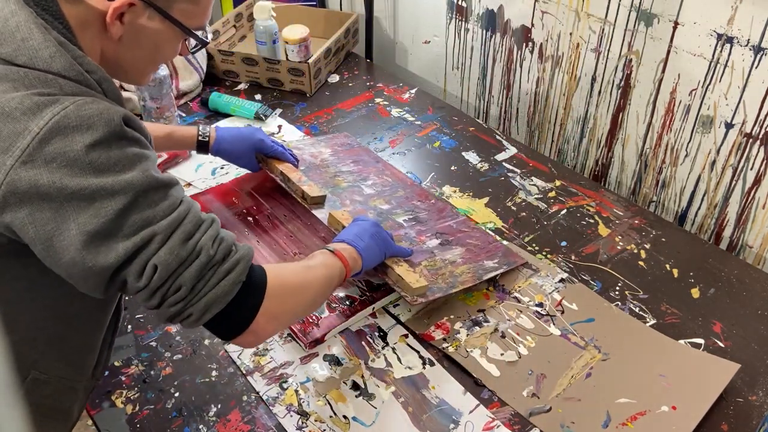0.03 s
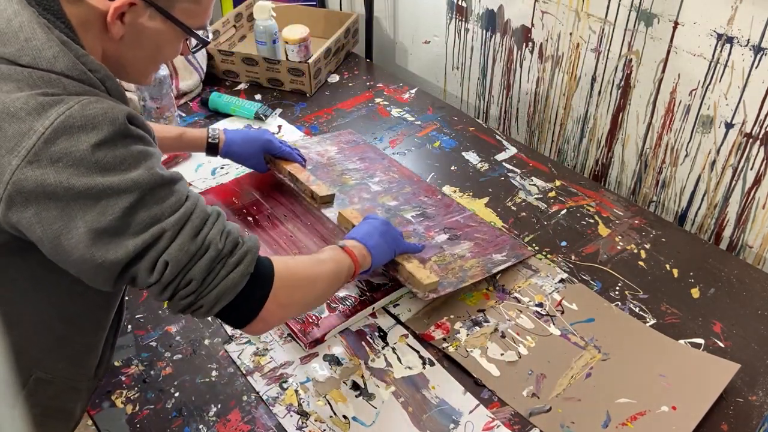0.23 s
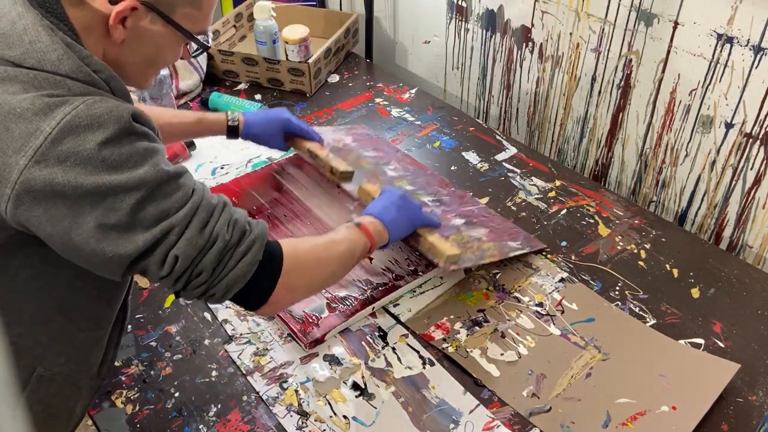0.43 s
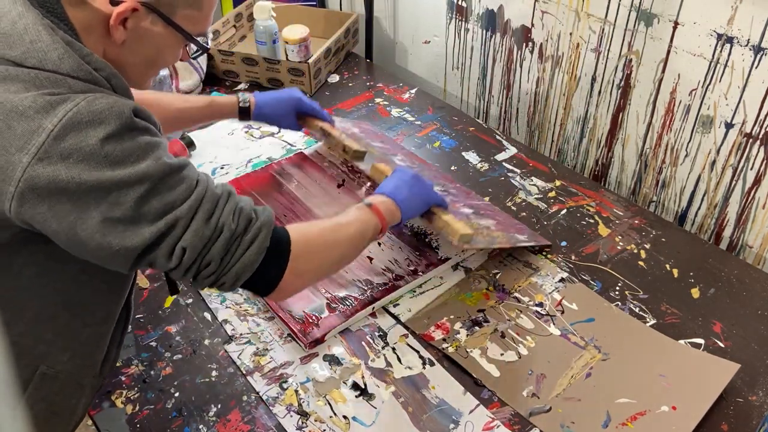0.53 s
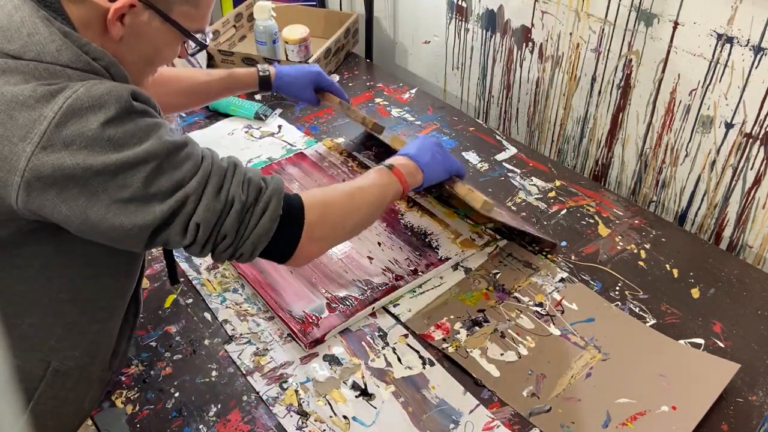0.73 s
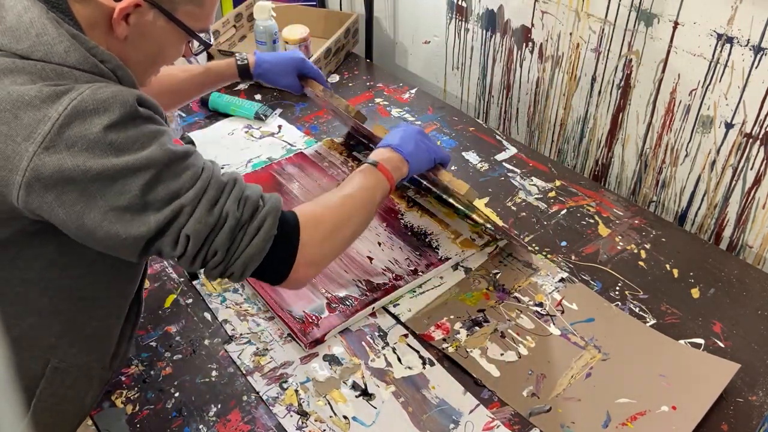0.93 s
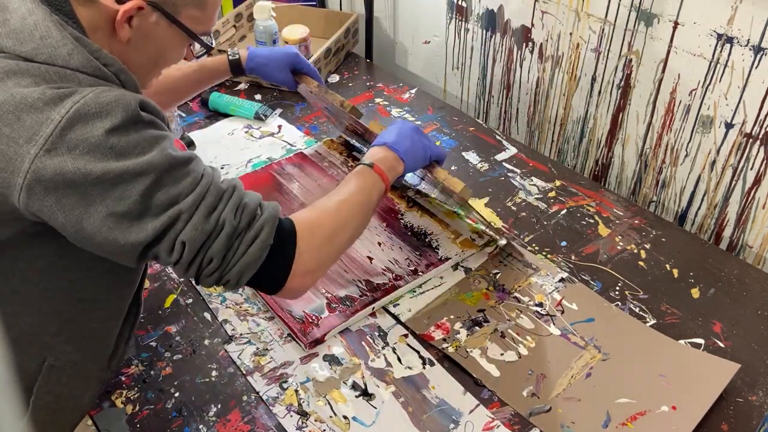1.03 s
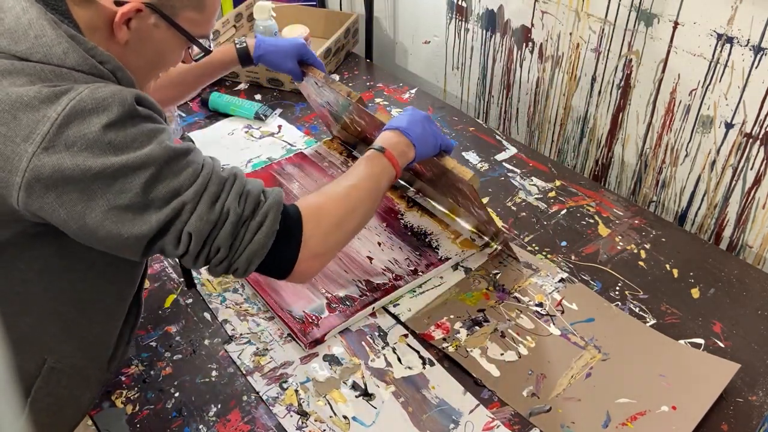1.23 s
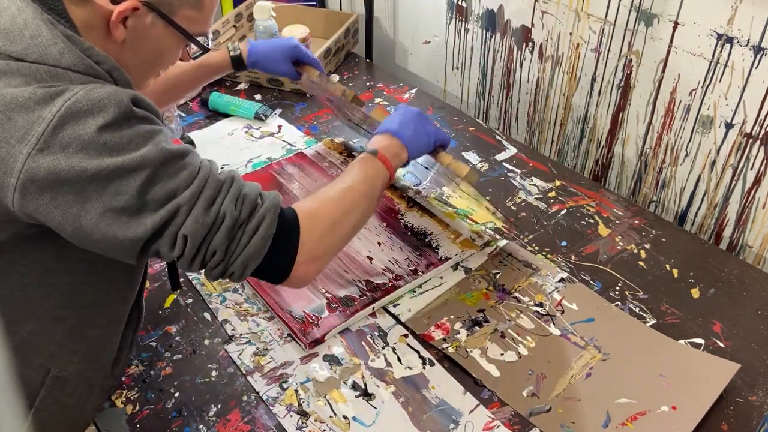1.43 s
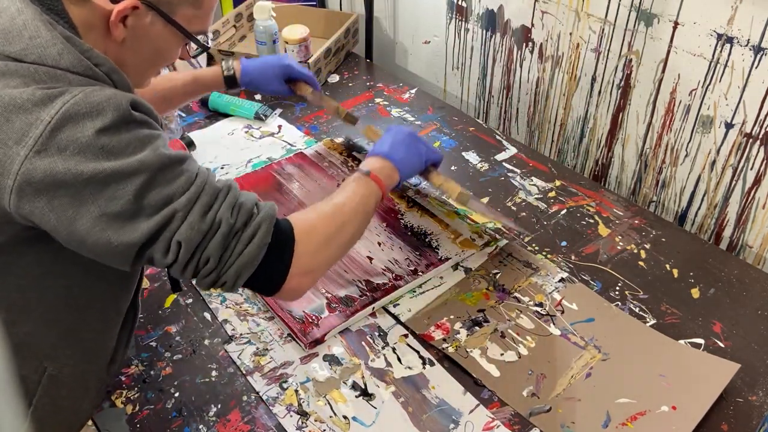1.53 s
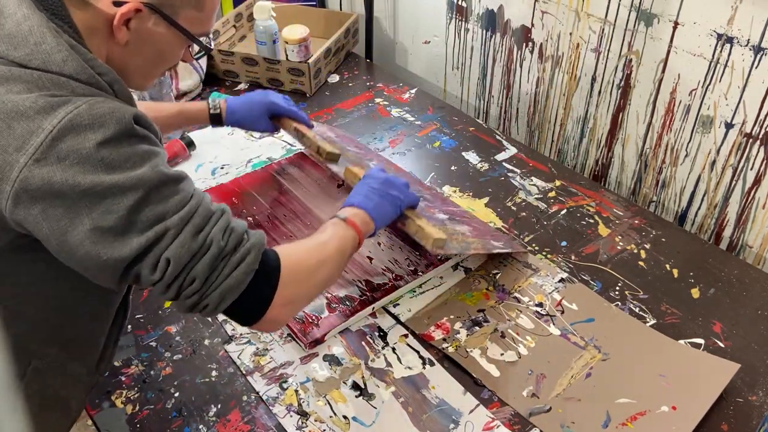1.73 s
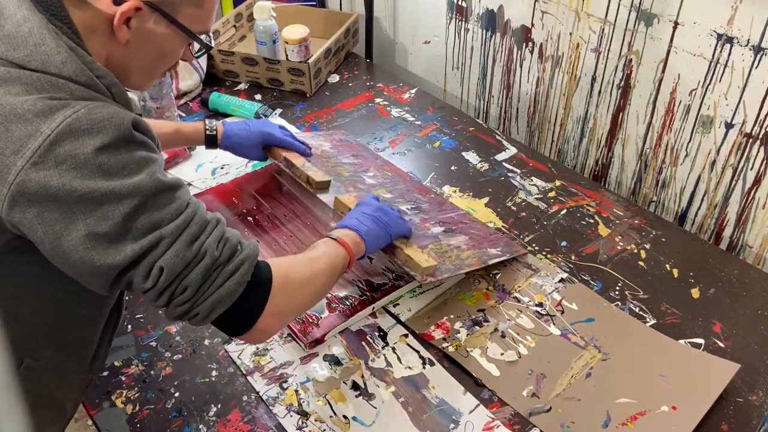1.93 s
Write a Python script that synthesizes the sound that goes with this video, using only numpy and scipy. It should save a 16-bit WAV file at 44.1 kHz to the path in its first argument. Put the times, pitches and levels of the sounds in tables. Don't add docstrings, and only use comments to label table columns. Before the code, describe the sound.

Rough, juddering scrape of a broad blade over wet canvas, a clattering lift, pause, and sharp knock

```python
import sys
import numpy as np
from scipy import signal
from scipy.fft import rfft, irfft
from scipy.io import wavfile
from scipy.ndimage import uniform_filter1d

SR = 44100
rng = np.random.default_rng(int(sys.argv[2]) if len(sys.argv) > 2 else 0)


def dump(signal):
    limited = np.clip(np.atleast_2d(signal).T, -1, 1)
    pcm = np.round(limited * 32767).astype(np.int16)
    wavfile.write(sys.argv[1], SR, pcm)


def volts_from_db(level):
    exponent = np.asarray(level, float) / 20
    return 10 ** exponent


N = 88200
T = np.arange(N) / SR


def unit(x):
    return x / np.sqrt(np.mean(x ** 2))


def curve(table, hz):
    f, v = np.array(table, float).T
    return np.interp(np.log(hz + 1), np.log(f + 1), v)


def colour(x, table):
    cepstrum = irfft(curve(table, np.arange(4097) * SR / 8192) * np.log(10) / 20)
    cepstrum[1:4096] *= 2
    cepstrum[4097:] = 0
    response = irfft(np.exp(rfft(cepstrum)))[:4096]
    return signal.fftconvolve(x, response)[:len(x)]


def butter(x, order, hz, kind="low"):
    return signal.sosfilt(signal.butter(order, hz, kind, fs=SR, output="sos"), x)


def fade(t60):
    return np.exp(-np.log(1000) * T / t60)


def burst(s, length):
    return (T >= s) * np.exp(-np.maximum(T - s, 0) / max(length, .001))


def walk(rate):
    held = np.interp(T * rate // 1, np.arange(4000), rng.standard_normal(4000))
    return 1.2 * uniform_filter1d(held, int(SR / rate))


def grains(rate, scatter_db):
    chance, sign, size = rng.random((3, N))
    slips = (chance < rate / SR) * np.sign(sign - .5)
    return unit(slips * volts_from_db(-scatter_db * np.log(size + 1e-4)))


def steady(slips):
    steady_s = .015
    power = uniform_filter1d(butter(slips, 2, 1300) ** 2, int(steady_s * SR))
    return unit(slips / np.sqrt(power + 1e-4))


def wide(mid, side):
    side = butter(side, 2, 362, "highpass")
    return np.array([mid + side, mid - side])


def studio():
    # (frequency [Hz], density [dB per Hz])
    noise_floor = [(24, 1), (40, 4.5), (71, 7), (346, -23.5), (412, -25), (1500, -41.5), (6950, -49.5),
                   (9130, -53), (12600, -48.5), (15000, -61)]
    floor_db, swell_db, swells_per_s, air_db = -51, 1.2, 18.0, -11.5
    mid, side = (colour(n, noise_floor) for n in rng.standard_normal((2, N)))
    air = volts_from_db(air_db) * side * np.array([[1], [-1]])
    return volts_from_db(floor_db + swell_db * walk(swells_per_s)) * (wide(mid, side) + air) / np.std(mid)


def effort():
    # (time [s], pressure [dB], edge hiss re pressure [dB], bite [dB])
    strokes = [
        [(0.0, -61, -6.5, -9.5), (0.052, -62.5, -5.5, -0.5), (0.132, -45, -12, -5.5), (0.144, -55, -14, 3.5),
         (0.164, -56, -1.5, 22.5), (0.194, -49.5, -11, -9.5), (0.202, -53, -11, -8.5), (0.266, -65, 6.5, 9),
         (0.285, -59, 0, 4)],
        [(0.29, -52.5, -14.5, 9.5), (0.305, -41.5, -17.5, 7.5), (0.335, -34.5, -14, 0), (0.36, -33, -11, 10),
         (0.382, -27, -14, 4), (0.403, -25, -27.5, -3.5), (0.425, -34, -11, -14.5), (0.46, -33.5, -20.5, -14),
         (0.5, -39, -15.5, -9)],
        [(0.52, -46, -20, -13.5), (0.56, -42.5, -9, -1.5), (0.59, -35, -20, -11.5), (0.618, -41, -9, -18.5),
         (0.66, -40.5, -11, -22.5), (0.69, -46.5, -9, -20.5), (0.72, -52.5, -8, -32), (0.75, -53.5, -1.5, -9)],
    ]
    # (time [s], pressure [dB], edge hiss re pressure [dB], bite [dB])
    returns = [
        [(0.755, -51, -10.5, -2.5), (0.767, -50.5, -3.5, -18), (0.819, -44, 0.5, 16), (0.927, -35, -16.5, -9.5),
         (0.951, -40, -10.5, 6), (0.969, -29.5, -13, 3.5), (1.0, -37, -20.5, -9)],
        [(1.02, -43, -26, -17.5), (1.05, -49, -19.5, -16.5), (1.1, -43, -20, -18), (1.15, -49, -16.5, -18.5),
         (1.195, -48.5, -18, -13), (1.26, -60, -24, -15)],
        [(1.683, -50.5, -29, -14.5), (1.694, -30.5, -27, -17.5), (1.708, -27.5, -7, -5),
         (1.736, -34, -23.5, -15.5), (1.786, -41, -22.5, -11), (1.83, -42.5, -24.5, -24.5),
         (1.874, -60.5, -4, -45), (1.968, -64, 0, -15.5), (2.0, -43.5, -15.5, 25)],
    ]
    lift_s = .035
    press, hiss = 0, 0
    for rows in strokes + returns:
        s, db, rel, bite = np.array(rows, float).T
        on = (T >= s[0]) * np.exp(-np.maximum(T - s[-1], 0) / lift_s)
        press = press + on * volts_from_db(np.interp(T, s, db))
        hiss = hiss + on * volts_from_db(np.interp(T, s, db + rel))
    rows = np.concatenate(strokes + returns)
    return press, hiss, np.interp(T, rows[:, 0], rows[:, 3])


def rubbing(press):
    slips_per_s, scatter_db = 3000, 2.2
    judder_per_s, judder_db = 70, 1.2
    return press * volts_from_db(judder_db * walk(judder_per_s)) * steady(grains(slips_per_s, scatter_db))


def edge_hiss(hiss):
    # (frequency [Hz], density [dB per Hz])
    hiss_spectrum = [(880, -21.5), (1500, -6), (1900, -4.5), (3380, -4), (4080, -9.5), (7030, -9),
                     (9010, -11.5), (16000, -23.5)]
    threads_per_s, scatter_db = 5900, 1.5
    rustle = unit(colour(grains(threads_per_s, scatter_db), hiss_spectrum))
    return volts_from_db(1.5) * hiss * rustle * volts_from_db(0.28 * walk(36.25))


def even(ir):
    evenness, body_t60_s = .85, .03
    s = rfft(ir)
    return unit(irfft(s / np.abs(s) ** evenness, len(ir)) * fade(2 * body_t60_s)[:len(ir)])


def body(force):
    # (frequency [Hz], density [dB per Hz])
    radiation = [(59, -47), (100, -8), (280, -3), (355, -1.5), (430, -1), (670, -4), (808, -8), (994, -9),
                 (1720, -14.5), (6790, -34.5), (9000, -60), (11700, -85), (19800, -120)]
    # (frequency [Hz], level [dB], decay t60 [s])
    mode_table = [(209, 2, 0.46), (251.1, -5.5, 0.68), (281, 7.5, 0.07), (300, -3.5, 0.17),
                  (430.4, 7, 0.025), (494.6, 9.5, 0.043), (549.4, -4, 0.14), (675, 2, 0.12), (741, -7.5, 1),
                  (834, 2, 0.26), (1021.4, 10.5, 0.04), (1378, 4, 0.033), (2046, 10, 0.066)]
    place_s, body_t60_s = .07, .03
    mode_db, spread_db = -15.5, -3.5
    n, hop = 10000, int(place_s * SR)
    modes = []
    for hz, db, t60 in mode_table:
        ring = volts_from_db(db) * np.sqrt(1 / t60) * fade(t60) * np.sin(2 * np.pi * hz * T)
        modes.append(ring[:n])
    modes = np.array(modes)
    tone = colour(np.eye(1, 2048)[0], radiation)
    driven = signal.fftconvolve(force, tone / np.sqrt(np.sum(tone ** 2)))[:N]
    padded = np.pad(driven, (hop, 2 * hop))
    window, decay = np.hanning(2 * hop), fade(body_t60_s)[:n]
    out = np.zeros((2, N + SR))
    for k, (a, b) in enumerate(rng.standard_normal((40, 2, n))[:N // hop + 1]):
        strengths = np.tanh(b[-len(modes):])
        mid = even(a * decay) + volts_from_db(mode_db) * unit(strengths @ modes)
        side = volts_from_db(spread_db) * even(b * decay)
        pair = np.array([mid, side]) / np.sqrt(n)
        push = window * padded[k * hop:(k + 2) * hop]
        part = signal.fftconvolve(pair, push[None], axes=1)
        out[:, k * hop:k * hop + part.shape[1]] += part
    return out[:, hop:hop + N]


def thumps():
    # (time [s], level [dB], frequency [Hz])
    pushes = [(0.069, -61, 65), (0.122, -63, 65), (.31, -38, 63), (0.438, -42, 67.4), (.60, -41, 67.6),
              (0.829, -44, 68.8), (0.978, -35, 65), (1, -36.5, 126.5), (1.187, -54, 54),
              (1.201, -54.5, 142), (1.301, -52.5, 141.8), (0.032, -54, 129), (0.083, -44.5, 146.2),
              (1.522, -42.5, 48.2), (1.716, -39.5, 66.4), (1.729, -34.5, 142.2), (1.788, -46.5, 137),
              (1.878, -43, 68)]
    t60_s, attack_s = 0.59, 0.009
    out = 0
    for s, db, hz in pushes:
        swell = burst(s, t60_s / np.log(1000)) * (1 - burst(s, attack_s))
        out = out + volts_from_db(db) * swell * np.sin(2 * np.pi * hz * (T - s))
    return out


def knock(s, length):
    attack_s = .0012
    return burst(s, length) * (1 - burst(s, attack_s)) * 2


def knocks():
    # (time [s], strength [dB], thud re strength [dB], rattle length [s])
    blows = [(0.078, -54.5, -2, 0.008), (0.098, -57, -24, 0.019), (0.121, -53, -35, 0.072),
             (0.291, -48.5, 8.5, 0.0038), (0.3114, -44, -7, 0.032), (0.328, -43.5, -9, 0.01),
             (0.36, -45, 14, 0.0089), (0.376, -34.5, 3, 0.011), (0.449, -48, 13.5, 0.0063),
             (0.476, -50.5, 9, 0.0045), (0.753, -53, 6.5, 0.013), (0.793, -36, -1.5, 0.0031),
             (0.8942, -36.5, 4, 0.0068), (0.9206, -48.5, 13.5, 0.0098), (0.954, -40, -11, 0.0079),
             (0.9604, -31.5, -2, 0.028), (0.9773, -25, -15, 0.0032), (1.061, -41, -7, 0.0092),
             (1.0915, -42.5, -7, 0.026), (1.162, -45.5, -7, 0.0026), (1.6807, -35, -7.5, 0.011),
             (1.6974, -25.5, 7.5, 0.0022), (1.709, -37, 5, 0.005), (1.751, -46.5, 6, 0.014),
             (1.807, -40.5, 6, 0.0048)]
    # (frequency [Hz], density [dB per Hz])
    crack_spectrum = [(470, -40.5), (800, -10.5), (1410, -8), (1700, -8), (3600, -10), (3830, -14),
                      (16000, -43)]
    thud = sum(volts_from_db(db + rel) * knock(s, d) for s, db, rel, d in blows) * steady(grains(5000, 4.5))
    crack = sum(volts_from_db(db) * knock(s, d) for s, db, rel, d in blows) * grains(6000, 0.83)
    pulse = colour(np.eye(1, 4096)[0], crack_spectrum)
    return thud, volts_from_db(-4) * colour(crack, crack_spectrum) / np.sqrt(np.sum(pulse ** 2))


def scraper():
    bite_hz, bite_top_hz, bite_usual_db = 870, 2070, -10.5
    press, hiss, bite_db = effort()
    thud, crack = knocks()
    force = rubbing(press) + thud
    low, high = butter(force, 2, bite_hz), butter(force, 2, bite_hz, "high")
    upper = butter(high, 2, bite_top_hz)
    bite = volts_from_db((np.clip(bite_db, -24, 4) - bite_usual_db) / 2)
    mid, side = body(low / bite - high - (bite - 1) * upper)
    return mid + edge_hiss(hiss) + crack, side


def singing():
    # (start [s], end [s], level [dB],
    # frequency [Hz])
    rubbing_tones = [(1.58, 1.675, -78, 1330), (.82, .89, -51, 3380), (.84, .9, -45, 760), (.12, .155, -50, 550),
                     (1.27, 1.31, -72, 1550),
                     (.1, 0.146, -48, 410), (.295, 0.343, -39.5, 1210), (.36, 0.389, -32.5, 997),
              (.383, 0.419, -29, 675), (.402, .418, -30, 1023), (.4, .43, -39, 278), (.44, 0.493, -41, 963),
              (.565, 0.615, -41, 628), (.61, 0.662, -47, 672), (.69, 0.734, -45.5, 325),
              (.9, 0.95, -46, 1040), (.962, .99, -36.5, 1385), (.965, 1.0, -37, 557),
              (1.083, 1.132, -46.5, 1020), (1.681, 1.69, -44, 3400), (1.7, 1.754, -36.5, 549),
              (1.807, 1.839, -51, 580), (1.81, 1.858, -42.5, 310), (0.314, 0.34, -44, 379),
              (1.72, 1.776, -46, 202.6), (1.903, 1.963, -56, 190.6), (1.176, 1.22, -52, 210),
              (1.992, 1.996, -55.5, 1245)]
    out = 0
    for a, b, db, hz in rubbing_tones:
        tone = butter(rng.standard_normal(N), 2, [.91 * hz, 1.09 * hz], "bandpass")
        swell = np.interp(T, [a, a + (b - a) / 3, b, b + 0.0025], [0, 1, 1, 0])
        out = out + volts_from_db(db) * swell * unit(tone)
    return out


def ticks():
    # (time [s], strength [dB], centre frequency [Hz], length [s])
    snaps = [(0.641, -41.5, 11990, 0.0026), (0.69, -47.5, 6500, 0.0098), (1.164, -59, 6900, 0.0088),
             (1.322, -61, 3240, 0.0043), (1.329, -75, 2930, 0.033), (1.509, -81, 11100, 0.011),
             (1.891, -61.5, 9020, 0.0055), (1.968, -54.5, 10700, 0.045)]
    fade_s, width = 0.002, 0.96
    out = 0
    for s, db, hz, length in snaps:
        band = [hz * (1 - width / 2), min(hz * (1 + width / 2), 20000)]
        noise = unit(butter(rng.standard_normal(N), 2, band, "bandpass"))
        out = out + volts_from_db(db) * (T >= s) * np.exp(-np.maximum(T - s - length, 0) / fade_s) * noise
    return out


def room(x):
    room_db, t60_s, treble_t60_s, split_hz = -5.5, 0.44, 0.17, 1100
    evenness, onset_s = .6, 0.0037
    tails = []
    for n in rng.standard_normal((2, N)):
        bass = butter(n, 1, split_hz)
        decaying = bass * fade(t60_s) + (n - bass) * fade(treble_t60_s)
        s = rfft(np.clip(T / onset_s, 0, 1) * decaying)
        levelling = (uniform_filter1d(np.abs(s), size=300) / np.abs(s)) ** evenness
        ir = irfft(s * levelling, N) * fade(2 * t60_s)
        tails.append(signal.fftconvolve(x, ir[:SR] / np.sqrt(np.sum(ir ** 2)) * .5)[:N])
    return volts_from_db(room_db) * wide(*tails)


def ports(x):
    # (frequency [Hz], left lead [rad])
    phase_lead = [(0, 0), (300, 0), (600, -1.25), (1120, .2), (2070, 1.0), (2500, -.7), (5430, -1.1),
                  (7000, .5), (16000, .9)]
    # (frequency [Hz], left minus right [dB])
    level_gap = [(60, 6), (110, 0), (200, -1), (380, 3), (700, -5), (1290, 0), (2380, -2), (4400, -7.5),
                 (8120, 0.5), (15000, 0.0)]
    hz = np.arange(N // 2 + 1) * SR / N
    turn = volts_from_db(curve(level_gap, hz) / 2) * np.exp(.5j * curve(phase_lead, hz))
    return np.array([irfft(rfft(x) * turn, N), irfft(rfft(x) / turn, N)])


def scene():
    mid, side = scraper()
    near = mid + ticks() + singing()
    return ports(near) + wide(0 * side, side) + room(near) + thumps() + studio()


def thin(x):
    # (low edge [Hz], high edge [Hz], share of time dropped [0-1])
    dropped = [(8700, 9300, .7), (11800, 12300, .45), (12300, 13000, .3), (13400, 13800, .15),
               (14900, 15300, .55), (15300, 16400, .75)]
    drops_per_s = 16
    hz, s = np.arange(N // 2 + 1) * SR / N, rfft(x)
    for (lo, hi, share), chance in zip(dropped, rng.random((len(dropped), 64))):
        gate = 1. * (chance < share)[(T * drops_per_s).astype(int)]
        x = x - uniform_filter1d(gate, size=300) * irfft(s * (hz > lo) * (hz <= hi), N)
    return x


def low_pass(x):
    return signal.sosfilt(signal.butter(12, 16380, fs=SR, output="sos"), x)


def record(dry):
    low_hz, top_hz, soft_top = 40.4, 15800, .3
    dip_hz, dip_width_hz, dip_db = 8980, 230, -14
    hz = np.arange(N // 2 + 1) * SR / N
    dip = volts_from_db(dip_db * np.exp(-((hz - dip_hz) / dip_width_hz) ** 4))
    gain = dip * (hz < top_hz) / np.sqrt(1 + (low_hz / (hz + 1)) ** 8)
    heard = irfft(rfft(dry) * gain, N)
    mix = thin(soft_top * np.tanh(heard / soft_top))
    return low_pass(mix)


dry = scene()
out = record(dry)
dump(out)
```